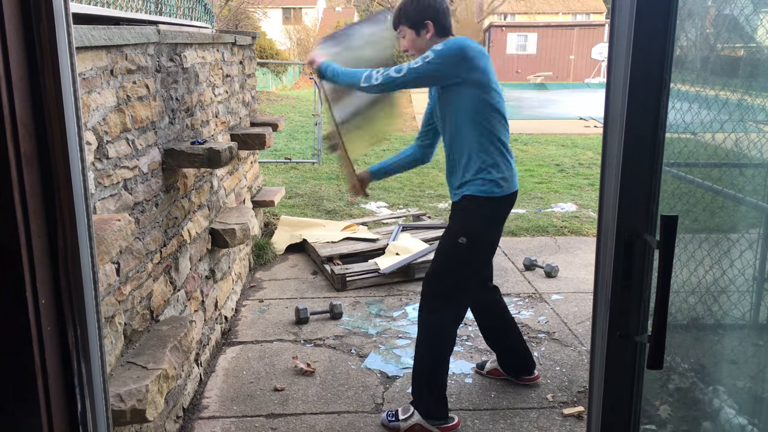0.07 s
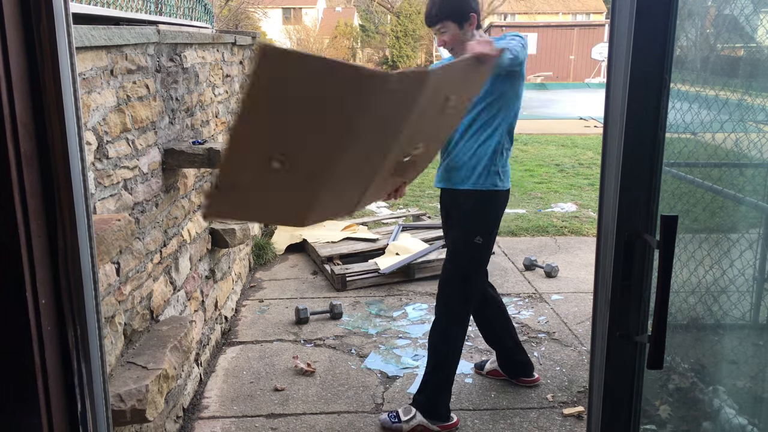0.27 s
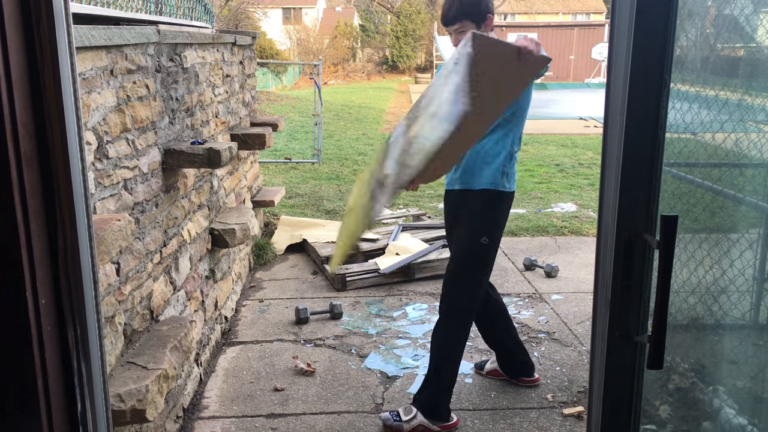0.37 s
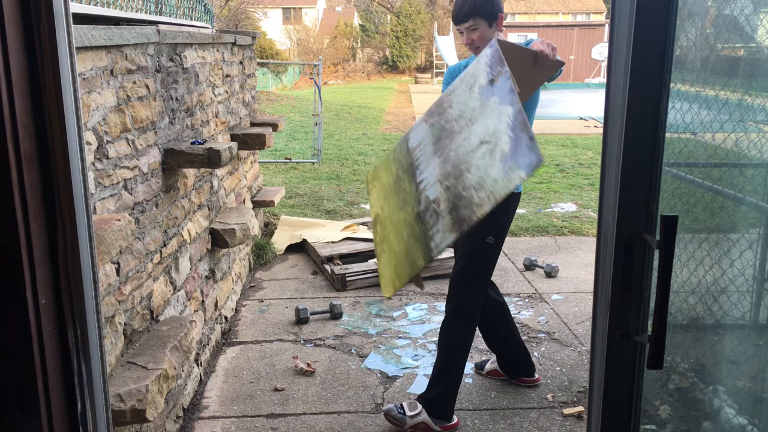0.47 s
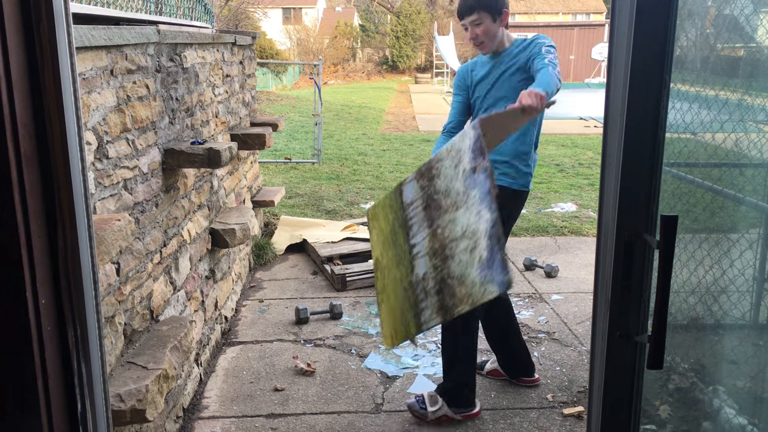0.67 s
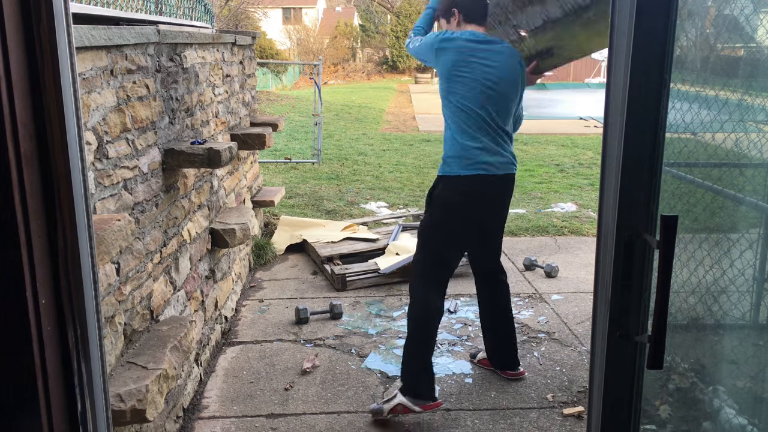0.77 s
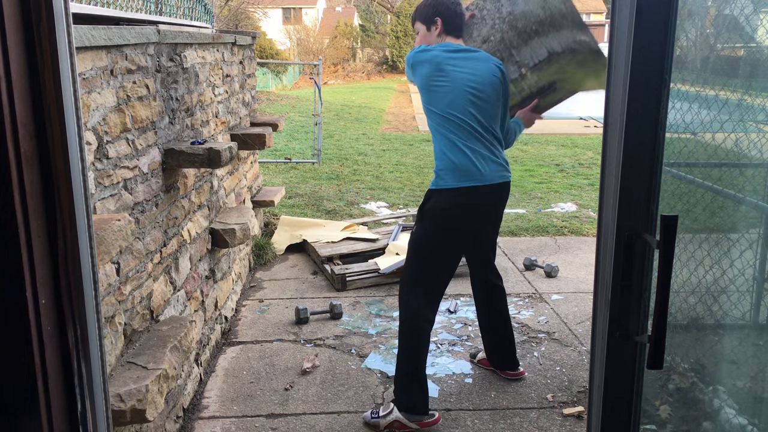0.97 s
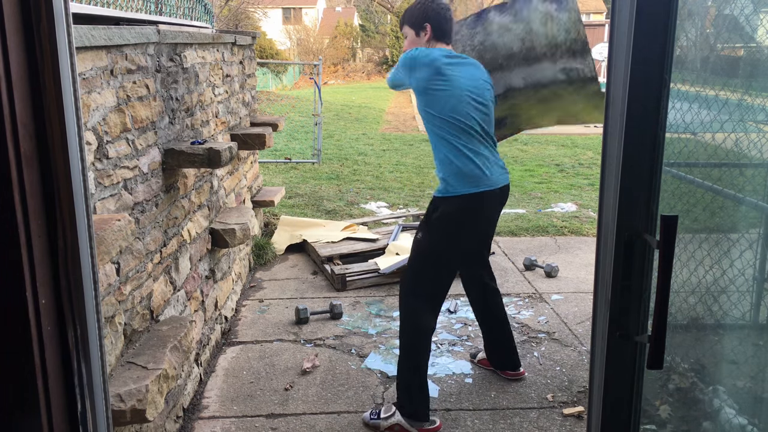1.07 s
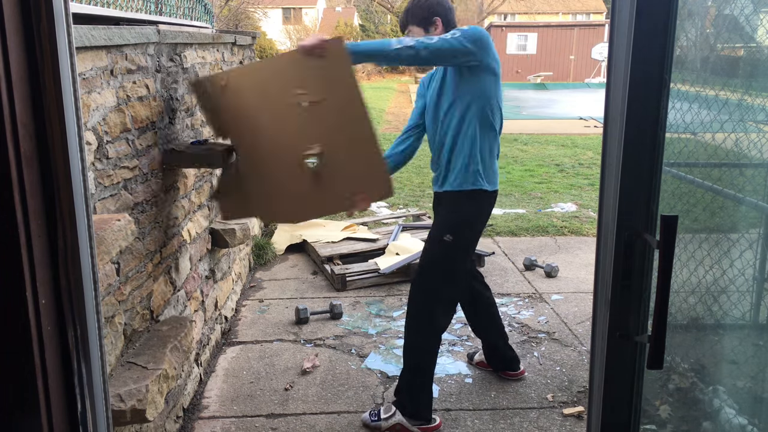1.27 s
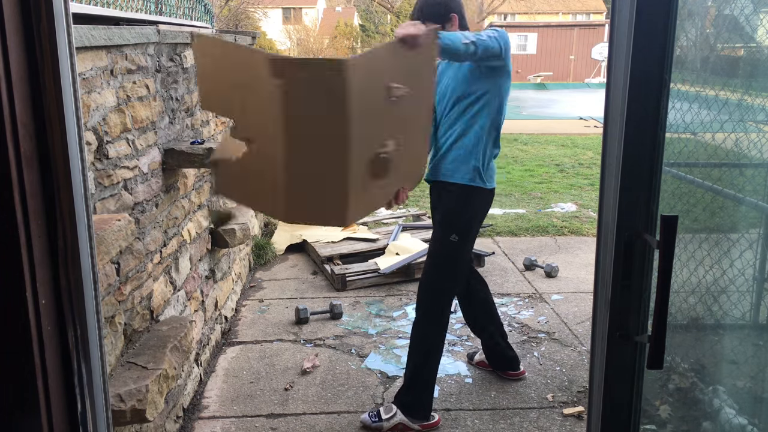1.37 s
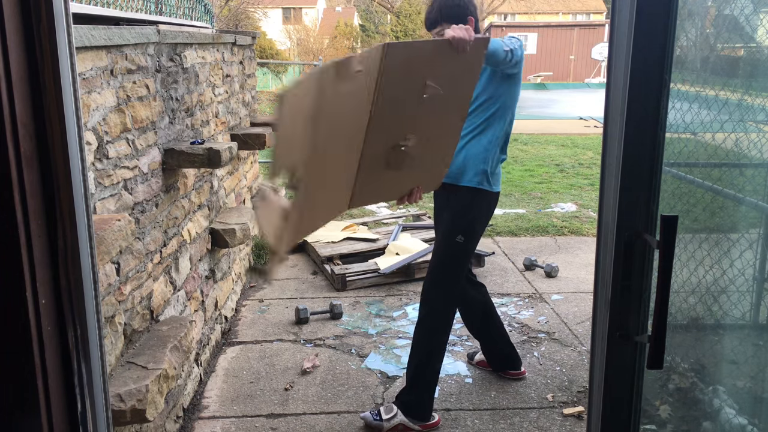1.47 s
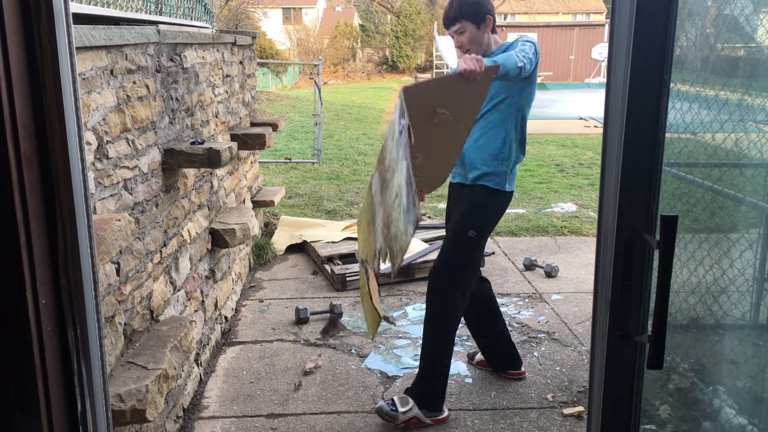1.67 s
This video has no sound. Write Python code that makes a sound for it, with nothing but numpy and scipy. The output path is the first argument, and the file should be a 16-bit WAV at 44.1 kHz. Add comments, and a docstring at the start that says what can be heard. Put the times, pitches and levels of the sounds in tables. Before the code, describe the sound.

A large fibreboard panel slams twice against a stone wall, with scraping and ticking debris.

```python
"""A big fibreboard panel is swung twice against a stone wall on a patio. Each swing swishes, then the
face slaps and cracks, its fibres crunch, and the sheet booms and flaps; wall and doorway answer.
The board drags on the stone after each hit, and the second swing also scrapes on its way in.
Chips tick on the paving, a piece clacks down, and feet and clothes scuff between the blows."""
import sys
import numpy as np
from scipy import signal
from scipy.fft import rfft, irfft, next_fast_len
from scipy.io import wavfile
from scipy.ndimage import map_coordinates

SR = 44100
rng = np.random.default_rng(int(sys.argv[2]) if len(sys.argv) > 2 else 0)


def dump_mix(stems):
    """Bounce the given channels to the path in sys.argv[1] as a 16-bit WAV at rate SR."""
    frames = np.atleast_2d(stems).T  # one column per channel
    limited = np.clip(frames, -1, 1)  # hard clip at full scale
    pcm = np.round(limited * 32767).astype(np.int16)
    wavfile.write(sys.argv[1], SR, pcm)


N = 74970

# Panel hits on the wall, two per swing: t/s, crunch/dB, crush length/s, tilt/(dB/oct), resonance/Hz,
# resonance/dB, crack/dB, boom/dB, most excited pitch/Hz, air push/dB, ring time factor
SLAMS = [(0.2473, -11.5, 0.013, 1.04, 1860, 3.5, -5.5, -13, 393, -10, 0.82),
         (0.2664, -12.5, 0.009, 0.77, 604, 12.5, -15.5, -8, 264, -27, 0.53),
         (1.3707, -9, 0.0034, 0.87, 1980, -1, -16, -14.5, 348, -38, 1),
         (1.382, -8.5, 0.0071, -1.5, 4100, 5, -43, -12.5, 185.6, -14, 1.1)]


def amp(db):
    """Decibels to gain."""
    return 10 ** (np.asarray(db) / 20)


def unit(x):
    """Scale to rms 1."""
    return x / np.sqrt(np.mean(x ** 2) + 1e-20)


def along(points, hz):
    """Read a curve of (f/Hz, value) points on a log-frequency axis."""
    f, v = np.transpose(points)
    return np.interp(np.log(hz + 1), np.log(f + 1), v)


def since(s):
    """Seconds since s, for every sample."""
    return np.arange(N) / SR - s


def burst(s, hold, t60):
    """Envelope: instant attack, hold, exponential release."""
    t = since(s)
    return (t >= 0) * amp(-60 * np.maximum(t - hold, 0) / t60)


def swells(rows):
    """Half-sine envelopes from rows of t/s, length/s, level/dB."""
    return sum(amp(db) * np.sin(np.pi * np.clip(since(s) / length, 0, 1)) for s, length, db in rows)


def wobble(rate):
    """A smooth random curve, rate knots a second."""
    return map_coordinates(rng.standard_normal(400), [np.arange(N) * rate / SR], mode="wrap")


def bell(hz, centre_hz, octaves=.33):
    """An EQ bell of height 1 on a log-frequency axis."""
    return np.exp(-(np.log2((hz + 1) / centre_hz) / octaves) ** 2)


def colour(x, points, tilt_db=0, peak_hz=1000, peak_db=0):
    """Minimum-phase EQ of unit power gain: a spectrum, a tilt per octave above 500 Hz and one bell."""
    m = 2 * next_fast_len(N)
    hz = np.fft.rfftfreq(m, 1 / SR)
    peak = peak_db * bell(hz, peak_hz)
    tilt = tilt_db * np.log2(np.maximum(hz, 500) / 500)
    gain = unit(amp(np.maximum(along(points, hz), -70) + peak + tilt))
    cepstrum = irfft(np.log(gain), m)
    cepstrum[1:m // 2] *= 2  # folded forward, so nothing rings ahead of a transient
    cepstrum[m // 2 + 1:] = 0
    return irfft(rfft(x, m) * np.exp(rfft(cepstrum)), m)[:N]


def grains(per_s):
    """Tiny clicks at random times, rms 1."""
    return unit((rng.random(N) < per_s / SR) * rng.standard_normal(N))


def rubs(strokes, spectrum, t60, grains_per_s, rise_s=0.0047):
    """Short strokes of gritty friction, each through its own EQ."""
    out = np.zeros(N)
    for s, length, db, tilt_db, peak_hz, peak_db in strokes:
        stroke = burst(s, length, t60) * np.clip(since(s) / rise_s, 0, 1)
        out += amp(db) * colour(grains(grains_per_s) * stroke, spectrum, tilt_db, peak_hz, peak_db)
    return out


def outdoor_air(level_db=-57.5):
    """A quiet, steady bed of outdoor air, mostly low rumble."""
    # Air spectrum: f/Hz, level/dB
    spectrum = [(20, -8), (55, 1.5), (110, 2.5), (200, -11.5), (500, -16.5), (1200, -19.5), (2300, -21),
                (2700, -27.5), (3400, -24.5), (9400, -32.5), (16000, -46.5)]
    return amp(level_db) * colour(rng.standard_normal(N), spectrum)


def patio(x, near_db=-15, far_db=-28, far_t60=0.97, predelay_s=0.0072):
    """Wall and doorway answer quickly; a faint tail comes from farther off."""
    # Decay of the near reflections: f/Hz, t60/s
    near_t60 = [(60, 0.16), (205, 0.43), (380, .19), (1500, 0.28), (5000, 0.28), (15000, 0.19)]
    # Tone of the far tail: f/Hz, level/dB
    far_tone = [(50, -1), (110, 0), (200, 1.5), (370, -11), (700, -11.5), (1400, -6.5), (8000, -11.5),
                (16000, -13)]
    hz, t, bands = signal.stft(rng.standard_normal(SR), SR, nperseg=256)
    decay = amp(-60 * t / along(near_t60, hz)[:, None])
    near = signal.istft(bands * decay, SR, nperseg=256)[1]
    far = colour(rng.standard_normal(N) * burst(0, 0, far_t60), far_tone)
    tail = amp(near_db) * near[:SR] / np.linalg.norm(near) + amp(far_db) * far[:SR] / np.linalg.norm(far)
    return signal.fftconvolve(x, np.pad(tail, (round(predelay_s * SR), 0)))[:N]


def clothes():
    """Cloth rubs in soft, grainy swells between the blows."""
    # Rustles: t/s, length/s, level/dB
    rustles = [(0.87, 0.068, -63), (0.93, 0.075, -62), (1.015, 0.072, -60.5), (1.195, 0.086, -55)]
    # Cloth spectrum: f/Hz, level/dB
    cloth = [(500, -35), (1500, -4.5), (2500, 1), (3800, 1), (4800, -30), (16000, -22.5)]
    return swells(rustles) * colour(grains(per_s=8400), cloth)


def shoes():
    """Soles scuff on the paving."""
    # Scuffs: t/s, length/s, level/dB, tilt/(dB/oct), resonance/Hz, resonance/dB
    scuffs = [(0.796, 0.0095, -48, 0.052, 1200, 2.4), (0.812, 0.029, -57, -2.4, 1174, 1.5),
              (0.906, 0.0078, -56, 1, 1430, 6.6)]
    # Sole spectrum: f/Hz, level/dB
    sole = [(120, -23), (200, -5.5), (968, -8), (1210, -1), (1680, -13), (1840, -5), (2650, -16),
            (4270, -11.5), (12400, -19), (16000, -23)]
    return rubs(scuffs, sole, t60=0.072, grains_per_s=8100)


def debris(chip_t60=0.008, piece_t60=0.022):
    """Chips tick on the paving and a larger piece clacks down."""
    # Chips landing: t/s, level/dB, tilt/(dB/oct)
    chips = [(0.021, -47, 3.5), (0.037, -50.5, -5), (0.415, -33.5, 10), (0.425, -35.5, -1), (0.43, -32, 6),
             (1.086, -48, 2), (1.1185, -48, 8), (1.133, -54, 9), (1.143, -54.5, 6), (1.253, -38.5, -11),
             (1.564, -35, -9), (1.618, -43, 4.5)]
    # Chip spectrum: f/Hz, level/dB
    chip_tone = [(300, -39.5), (1200, -3.5), (2500, -4.5), (5500, 6.5), (9000, -4.5), (16000, -16)]
    # The broken piece lands, edge then face: t/s, level/dB
    landings = [(1.6808, -31), (1.685, -24.5)]
    # Body of the piece: f/Hz, level/dB
    piece_tone = [(300, -8), (600, -14), (900, -7.5), (2300, -1.5), (2600, -8.5), (3400, -5.5), (3800, -16),
                  (4280, -3), (5000, -9.5), (7250, -6.5), (10000, -12.5), (16000, -9)]
    ticks = sum(amp(db) * colour(rng.standard_normal(N) * burst(s, 0, chip_t60), chip_tone, tilt_db)
                for s, db, tilt_db in chips)
    contacts = sum(amp(db) * burst(s, 0, piece_t60) for s, db in landings)
    return ticks + colour(contacts * rng.standard_normal(N), piece_tone)


def swish():
    """Air rushes round the moving panel, loudest at top speed."""
    # Panel moves: t/s at top speed, level/dB, rise/(dB/s), fall/(dB/s), tilt/(dB/oct)
    moves = [(0.186, -49.5, 339, 123, 3), (0.246, -39, 220, 398, -1), (0.488, -50, 198, 129, -1),
             (0.685, -54, 195.5, 224.5, 2.5), (1.331, -44, 186, 292, 1)]
    # Whoosh spectrum: f/Hz, level/dB
    whoosh = [(18, -36.5), (30, -10), (118, 2), (311, -7), (554, -12), (702, -7), (4650, -20), (8520, -25),
              (16000, -33.5)]
    out = np.zeros(N)
    for s, db, rise, fall, tilt_db in moves:
        envelope = amp(db + np.minimum(rise * since(s), -fall * since(s)))
        out += envelope * colour(rng.standard_normal(N), whoosh, tilt_db)
    return out


def scrape():
    """The board drags over the gritty stone."""
    # Drags: t/s, length/s, level/dB, tilt/(dB/oct), resonance/Hz, resonance/dB
    drags = [(0.287, 0.0046, -18, 3, 5730, 5), (0.297, 0.034, -33, -4, 1200, 3),
             (0.409, 0.024, -53, 6, 6000, 9), (1.3172, 0.015, -33, -0.5, 2130, 8),
             (1.329, 0.076, -29.5, 1, 8400, -1), (1.349, 0.013, -20.5, 1, 4000, 3),
             (1.402, 0.025, -26, -2.5, 700, 17.5), (1.423, 0.014, -24, 0, 1070, 6.5),
             (1.444, 0.003, -23, 0.5, 8000, 1.5), (1.45, 0.026, -36, -1.5, 1500, -9)]
    # Grit spectrum: f/Hz, level/dB
    grit = [(180, -49.5), (300, -9.5), (614, -13.5), (1250, 0.5), (1430, -1.5), (2250, -3), (2740, -6.5),
            (3700, -1.5), (4020, -7.5), (8220, -7), (16000, -25)]
    return rubs(drags, grit, t60=0.042, grains_per_s=13000)


def flap(hz=47, jitter_s=0.0014):
    """The flexing board flaps in the hands after each blow: a low, unsteady tone."""
    # Flaps: t/s, length/s, level/dB
    flaps = [(0.31, 0.14, -48), (0.425, 0.0555, -34.5), (1.44, 0.19, -40.5)]
    return swells(flaps) * np.sin(2 * np.pi * hz * (since(0) + jitter_s * wobble(rate=45)))


def air_push(s, end_hz=42.6, sag_hz=24.3, sag_s=0.041, rise_s=.009, t60=.15):
    """The flexing sheet squeezes out a puff of air: a sub thump that sags in pitch."""
    t = np.maximum(since(s), 0)
    cycles = end_hz * t + sag_hz * sag_s * (1 - np.exp(-t / sag_s))
    envelope = burst(s, 2 * rise_s, t60) * (1 - np.exp(-(t / rise_s) ** 2))
    return np.sin(2 * np.pi * cycles) * envelope


def boom(attack_share=0.034, excited_db=12, bend_share=.017):
    """Each hit pushes out air and rings the board; the contact point favours modes near one pitch."""
    # Board modes, before each hit's weighting and ring factor: f/Hz, level/dB, t60/s
    modes = [(103, -9.5, 0.14), (156.3, -15, 0.15), (203, -9.5, 0.27), (262.4, -11.5, 0.16),
             (277.5, -7, 0.13), (313.8, -15.5, 0.27), (364.3, -2, 0.12), (489.3, -18.5, 0.21),
             (593, -17.5, 0.14), (697.5, -8.5, 0.13), (766, -17, 0.18), (1029, -20, 0.31)]
    out = np.zeros(N)
    for s, *_, boom_db, excited_hz, push_db, ring in SLAMS:
        t = np.maximum(since(s), 0)
        for k, (hz, db, t60) in enumerate(modes):
            bend = 1 + bend_share * wobble(rate=45)  # flexing bends the pitch
            bent_time = np.cumsum((t > 0) * bend) / SR
            tone = (-1) ** k * np.sin(2 * np.pi * hz * bent_time)
            attack = 1 - np.exp(-t / (attack_share * t60))  # long rings also swell slowly
            level_db = boom_db + db + excited_db * bell(hz, excited_hz) + rng.normal(0, 1)
            out += tone * attack * amp(level_db - 60 * t / (t60 * ring))
        out += amp(push_db) * air_push(s)
    return out


def crunch(slap_db=2, slap_t60=0.0036, fibre_t60=0.064):
    """The face slaps the stone with a hard crack, then its fibres break for a moment."""
    # Spectrum of slap and breaking fibres: f/Hz, level/dB
    spectrum = [(240, -8.5), (370, -6), (470, -14), (687, -11), (879, -12.5), (2250, -15), (2710, -16),
                (4440, -16), (5030, -17.5), (9470, -20.5), (16000, -28)]
    # Crack of the stiff face: f/Hz, level/dB, t60/s
    crack_modes = [(1610, -5.5, 0.035), (1657, -12.5, 0.013), (1906, -5.5, 0.017), (2258, -3.5, 0.031)]
    out = np.zeros(N)
    for s, db, hold, tilt_db, peak_hz, peak_db, crack_db, *_ in SLAMS:
        fibres = grains(per_s=27000) * burst(s, hold, fibre_t60)
        slap = amp(slap_db) * rng.standard_normal(N) * burst(s, 0, slap_t60)
        out += amp(db) * colour(fibres + slap, spectrum, tilt_db, peak_hz, peak_db)
        for k, (hz, mode_db, t60) in enumerate(crack_modes):
            tone = (-1) ** k * np.sin(2 * np.pi * hz * since(s))
            out += amp(crack_db + mode_db) * tone * burst(s, 0, t60)
    return out


def scene():
    """Hits and friction echo on the patio over the air bed; the level dips briefly between the swings."""
    dip_at_s, dip_width_s, dip_db = .853, .017, -19
    contacts = crunch() + boom() + flap() + debris() + scrape() + shoes()
    mix = contacts + outdoor_air() + patio(contacts) + clothes() + swish()
    dip = amp(dip_db * np.exp(-(since(dip_at_s) / dip_width_s) ** 2))
    return (mix * dip)[None]


def record(dry):
    """The blows overload the microphone softly; a steep low-pass trims the top."""
    ceiling, top_hz = 1.02, 16000
    clipped = dry / (1 + np.abs(dry / ceiling) ** 4) ** (1 / 4)
    m = 2 * next_fast_len(N)
    low_pass = 1 / (1 + (np.fft.rfftfreq(m, 1 / SR) / top_hz) ** 90)
    return irfft(rfft(clipped, m) * low_pass, m)[..., :N]


dry = scene()
out = record(dry)
dump_mix(out)
```